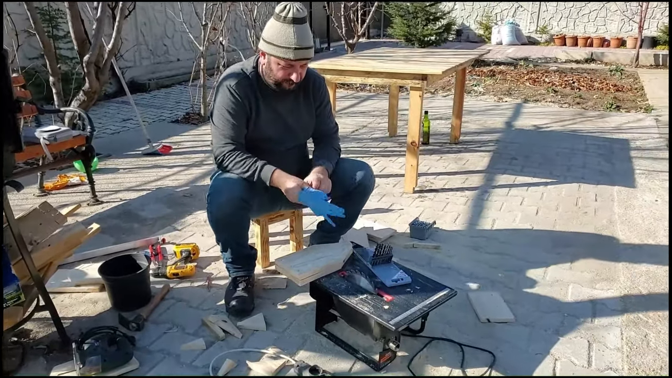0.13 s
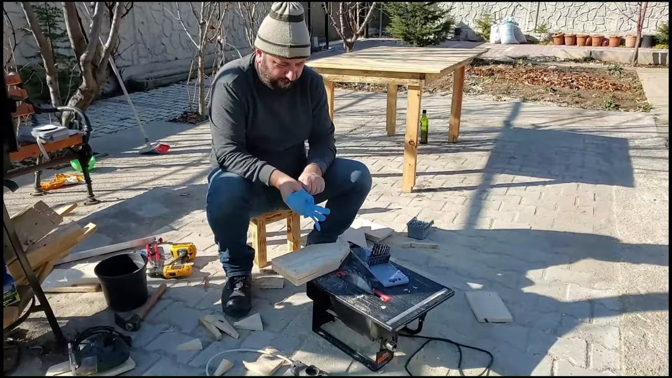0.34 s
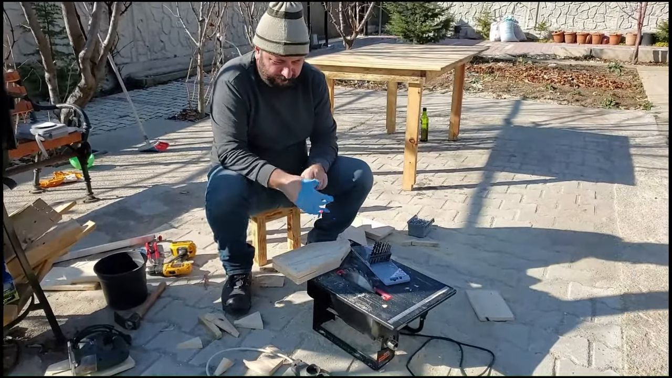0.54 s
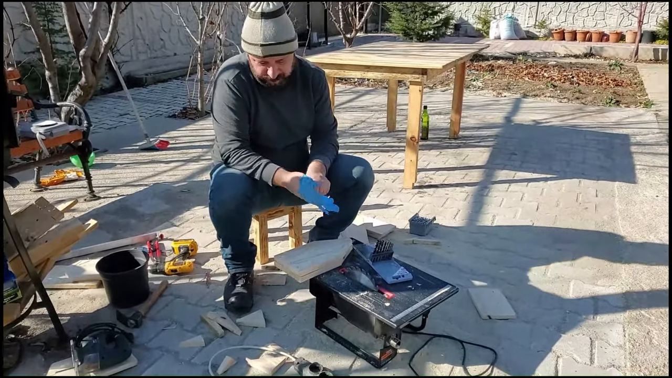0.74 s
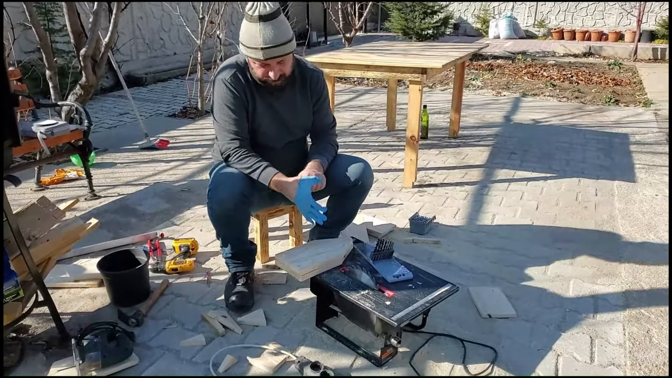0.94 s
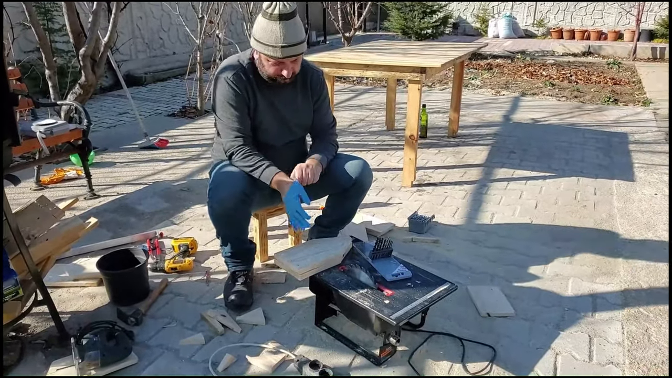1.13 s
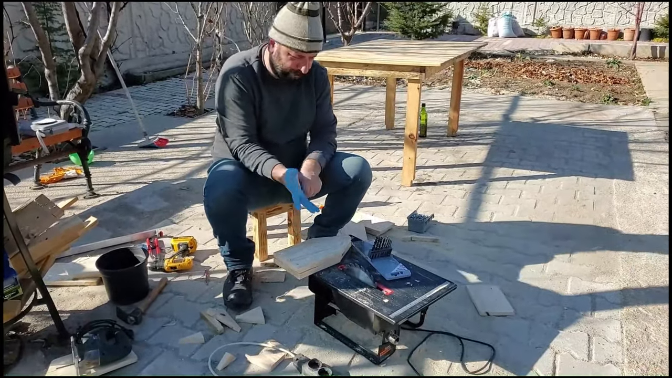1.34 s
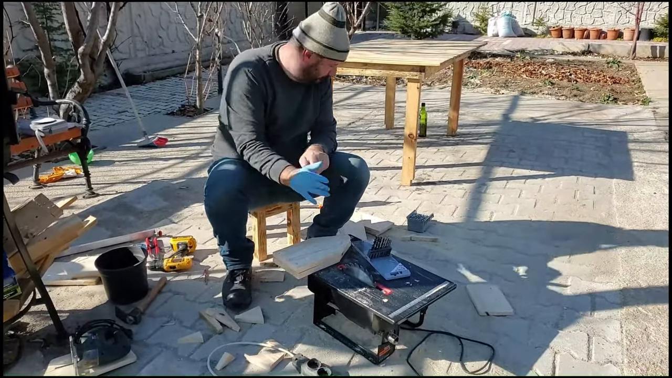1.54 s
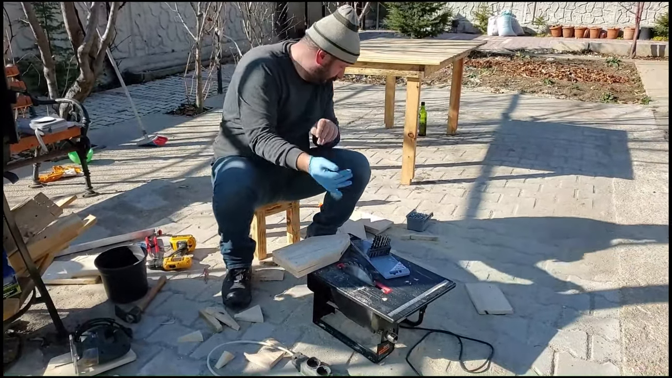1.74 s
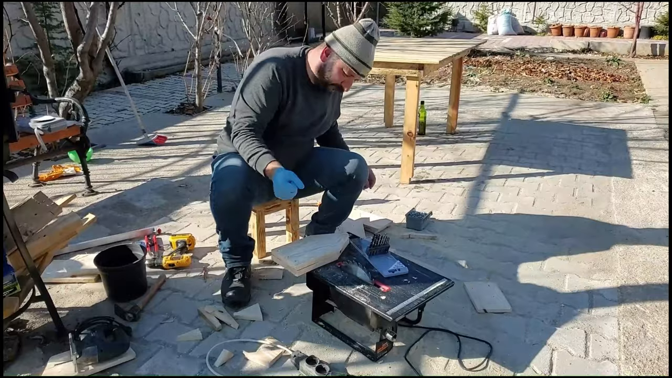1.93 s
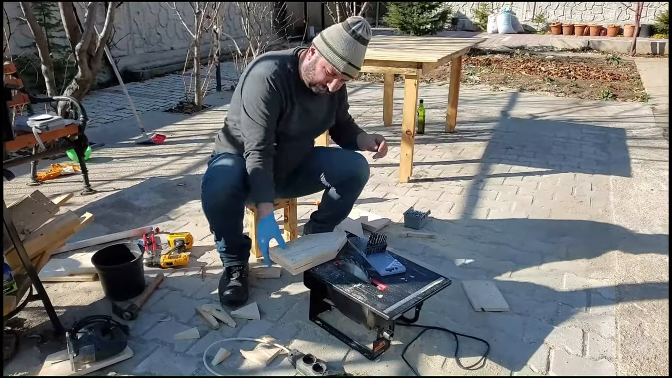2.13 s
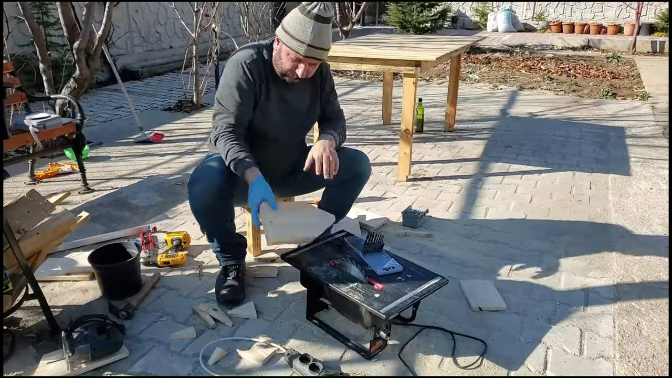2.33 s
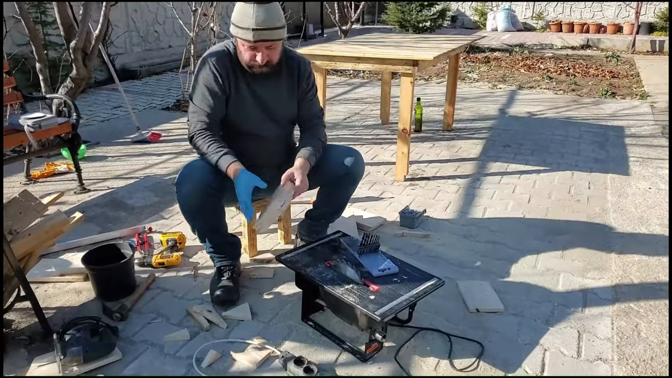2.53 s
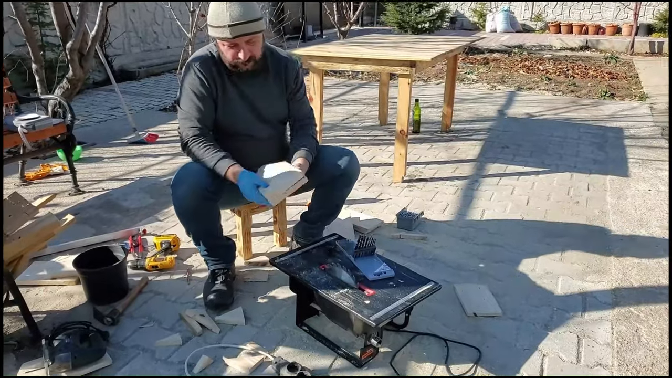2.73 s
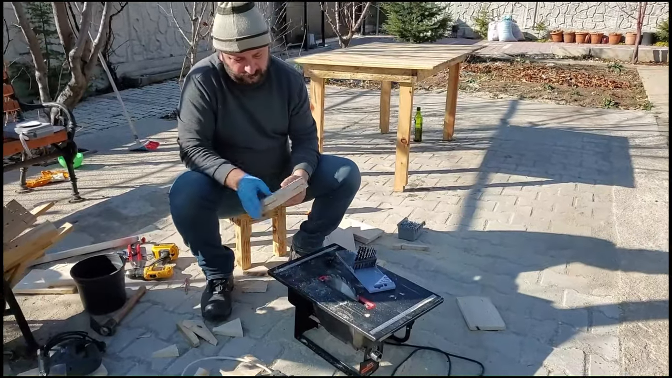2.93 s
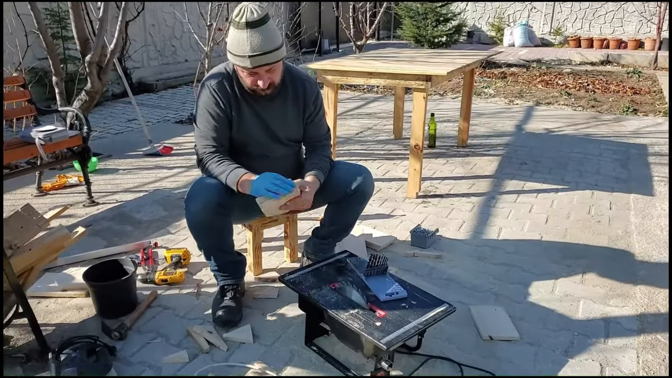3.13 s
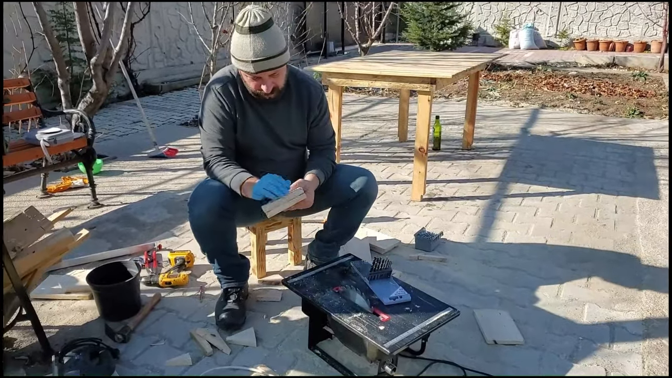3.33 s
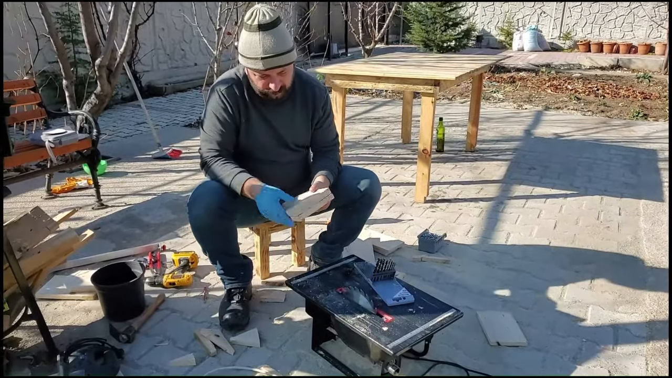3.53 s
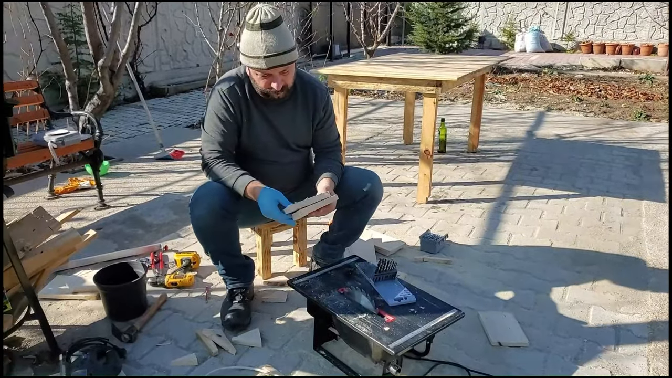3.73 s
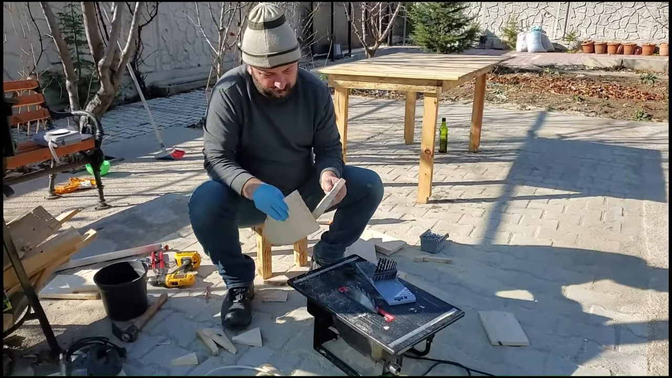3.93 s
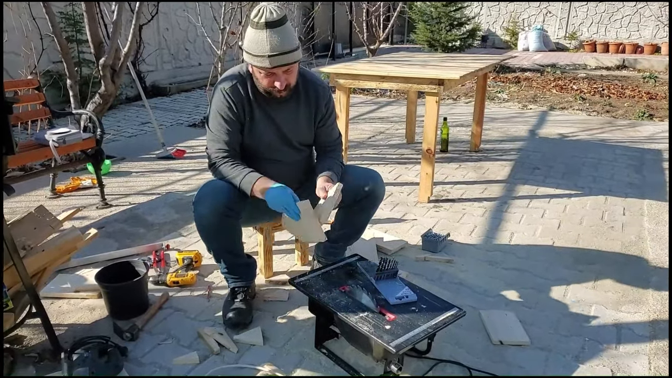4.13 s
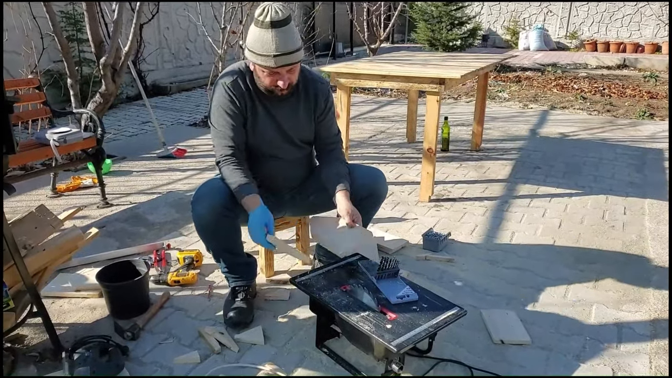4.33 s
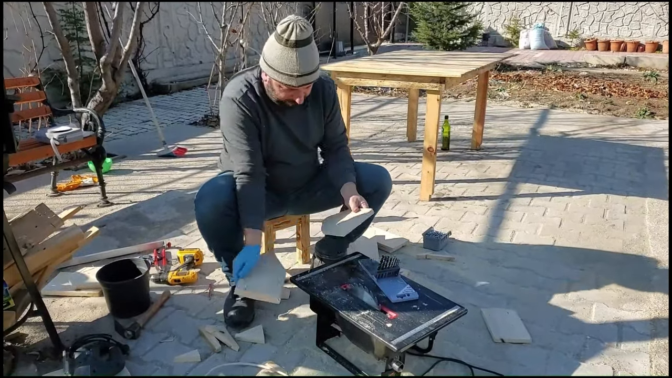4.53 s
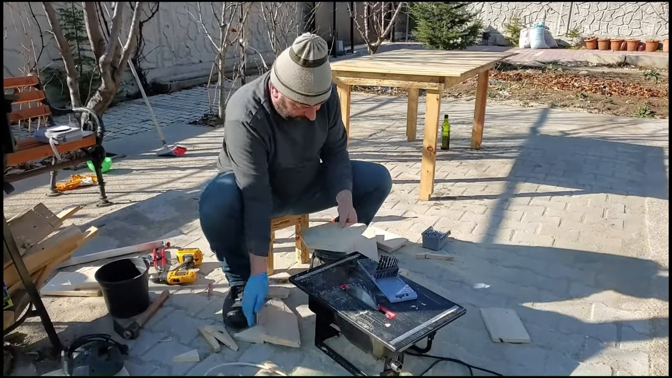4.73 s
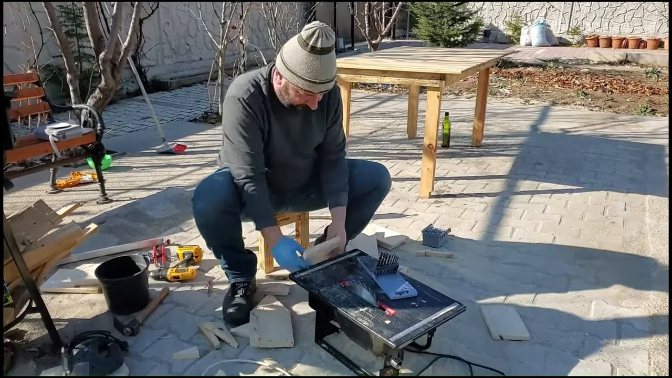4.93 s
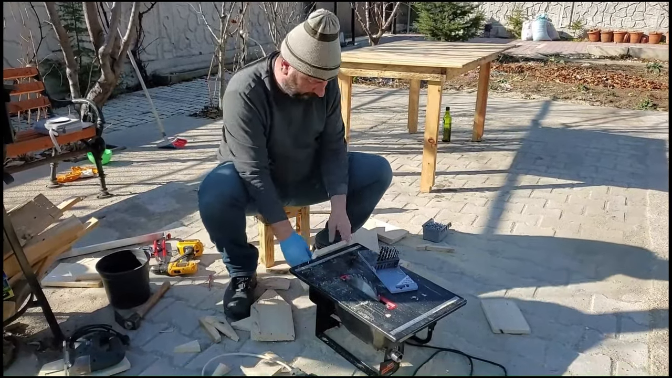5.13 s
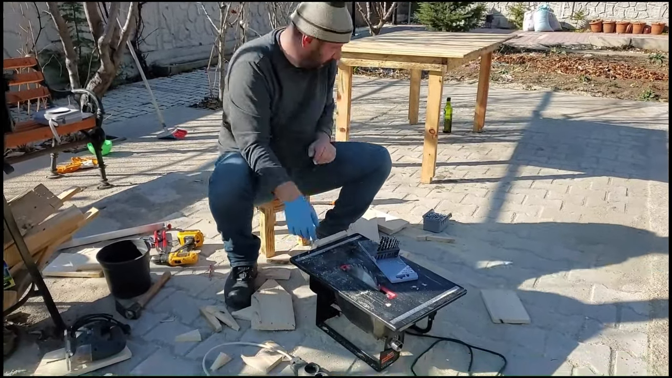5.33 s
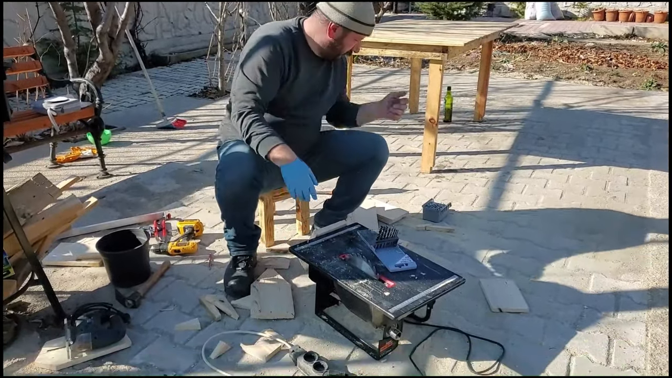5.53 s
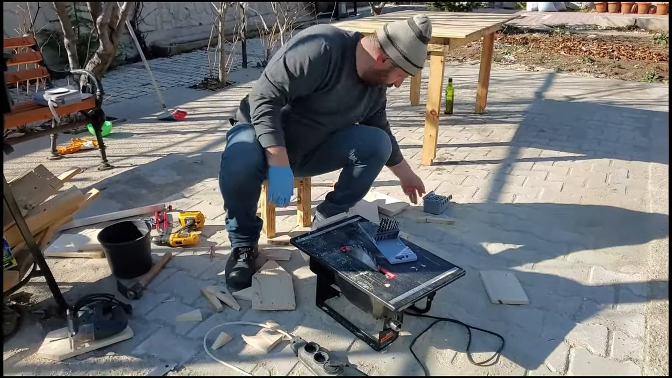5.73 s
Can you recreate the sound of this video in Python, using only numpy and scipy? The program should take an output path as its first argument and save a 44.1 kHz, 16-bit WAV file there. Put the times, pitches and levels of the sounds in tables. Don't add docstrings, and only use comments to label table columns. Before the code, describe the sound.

Soft finger rubbing starts quietly, followed by rubber squeaking and snapping, then cloth rustle and light wood scrapes. Two short, dry wooden claps with small rattles come next, then a bright clatter of a board on paving, a flat slap and a ringing corner touch. Small faint touches end it. Outdoor stereo pickup at moderate distance, with short wall reflections, low engine hum, distant road and light hiss.

```python
import sys
import numpy as np
from scipy import signal
from scipy.fft import rfft, irfft, next_fast_len
from scipy.io import wavfile
from scipy.ndimage import uniform_filter1d, map_coordinates

SR = 44100
rng = np.random.default_rng(int(sys.argv[2]) if len(sys.argv) > 2 else 0)


def log_audio(samples):
    frames = np.atleast_2d(samples).T
    limited = np.clip(frames, -1, 1)
    pcm = np.round(limited * 32767).astype(np.int16)
    wavfile.write(sys.argv[1], SR, pcm)


def gain_from_db(level_db):
    decades = np.asarray(level_db, float) / 20
    return 10 ** decades


N = 254942


def unit(x):
    return x / np.sqrt(np.mean(x ** 2) + 1e-20)


def along(points, hz):
    f, v = np.transpose(points)
    return np.interp(np.log(hz + 1), np.log(f + 1), v)


def curves(rows):
    s, *cols = np.transpose(rows)
    return [np.interp(np.arange(N) / SR, s, c) for c in cols]


def wobble(rate_hz):
    knots = rng.standard_normal(int(N * rate_hz / SR) + 4)
    return map_coordinates(knots, [np.arange(N) * rate_hz / SR])


def filtered(x, response):
    m = next_fast_len(N + SR // 2)
    return irfft(rfft(x, m) * response(np.fft.rfftfreq(m, 1 / SR)), m)[..., :N]


def coloured(x, gain):
    n = x.shape[-1]
    return unit(irfft(rfft(x) * gain(np.fft.rfftfreq(n, 1 / SR)), n))


def add(track, s, sound):
    part = track[..., round(s * SR):][..., :sound.shape[-1]]
    part += sound[..., :part.shape[-1]]


# frequency in Hz, left-right likeness.
LIKENESS = [(60, 1.0), (180, 0.9), (550, -0.07), (1650, -0.187), (4970, -0.12), (15000, 0.074)]


def rush(spectrum, patchy_db):
    z = signal.stft(rng.standard_normal((2, N)), nperseg=512)[2]
    field = uniform_filter1d(rng.standard_normal(z.shape[1:]), 6, 0)
    field = uniform_filter1d(field, 14, 1)
    pair = signal.istft(z * gain_from_db(patchy_db * unit(field)), nperseg=512)[1][:, :N]

    def mid_side(hz):
        turn = np.arccos(np.clip(along(LIKENESS, hz), -.93, .93)) / 2
        return gain_from_db(along(spectrum, hz)) * [np.cos(turn), np.sin(turn)]

    mid, side = filtered(pair, mid_side)
    return unit(np.array([mid + side, mid - side]))


# frequency in Hz, level in dB per Hz.
RUMBLE_SPECTRUM = [(12, -49), (24, -16.5), (48, -2), (66, -4), (82, -6), (92, -16.5), (300, -34.5),
                   (420, -86)]
TRAFFIC_SPECTRUM = [(150, -6.5), (204, -13.5), (274, -1.5), (1260, -3.5), (1850, -12), (2860, -26.5),
                    (6000, -44.5), (9000, -91.5)]
HISS_SPECTRUM = [(1470, -35), (2500, 0.5), (5710, -5), (7030, -6), (8520, -7), (14900, -4.5),
                 (15800, -10.5)]
# time in seconds, level in dB.
ROAD_LEVEL = [(0, -88.5), (.15, -84.5), (2.1, -82), (2.6, -78.5), (3.2, -74.5), (3.7, -77.5), (4.3, -72),
              (5.5, -73.5), (5.78, -70.5)]
RUMBLE_LEVEL = [(0, -62.5), (.7, -59), (.9, -56.5), (1.4, -60), (3.3, -60), (4.0, -61), (5.78, -55.5)]
# time in seconds, pitch in Hz, level in dB.
ENGINE_NOTES = [
    [(-.1, 57.8, -77), (0.278, 54.82, -60), (0.454, 53.76, -57.5), (0.8, 55.8, -62.5)],
    [(2.2, 62.74, -73.5), (2.6, 63.32, -59.5), (3.0, 62.35, -56.5), (3.3, 64.84, -56), (3.55, 62.23, -60),
     (3.75, 64.3, -59.5)],
    [(.75, 64, -63), (.9, 64.9, -54.5), (1.1, 67.3, -63), (1.35, 66.5, -67)],
    [(3.9, 66.7, -53.5), (4.1, 65.05, -60), (4.6, 62.45, -64.5), (5.1, 63.3, -64), (5.45, 63.3, -64.5),
     (5.9, 60.34, -62)],
    [(4.1, 292.4, -81.5), (4.3, 298, -81), (4.55, 300, -85)],
]


def yard():
    (road_db,), (rumble_db,) = curves(ROAD_LEVEL), curves(RUMBLE_LEVEL)
    road_lean_db, hiss_lean_db = [[.8], [-.8]], [[1.5], [-1.5]]
    sound = gain_from_db(rumble_db) * rush(RUMBLE_SPECTRUM, patchy_db=0.73)
    sound += gain_from_db(road_db + .4 * wobble(3)) * rush(TRAFFIC_SPECTRUM, patchy_db=1.1) * gain_from_db(road_lean_db)
    sound += gain_from_db(-89.5 + .7 * wobble(5.0)) * rush(HISS_SPECTRUM, patchy_db=2.5) * gain_from_db(hiss_lean_db)
    t = np.arange(N) / SR
    for rows in ENGINE_NOTES:
        hz, db = curves(rows)
        fade = np.clip(np.minimum(t - rows[0][0], rows[-1][0] - t) / 0.099, 0, 1)
        tone = np.sin(2 * np.pi * np.cumsum(hz) / SR)
        sound += np.sqrt(2) * gain_from_db(db + 0.64 * wobble(1.6)) * fade * tone
    return sound


# frequency in Hz, left minus right in dB.
SHADE = [(60, -4), (700, 3.5), (2070, 3), (3450, 0.5), (4800, 7.5), (8800, 9), (11500, 11), (15000, 7)]
# frequency in Hz, phase in radians by which left leads.
PHASE_LEAD = [(0, -0.5), (700, 0.06), (2070, 0.89), (3450, 0.97), (4800, 3), (8350, 12), (12000, 18),
              (15500, 21)]
# frequency in Hz, share.
STRAY_SHARE = [(150, .03), (750, .2), (1100, .45), (1700, .42), (2500, .35), (4000, 0.69), (8000, 0.64)]


def ports(x, lean):
    half = np.array([[.5], [-.5]])
    detours_s = rng.random((4, 1)) * .006
    ground_share, ground_s = 0.29, np.array([[0.0012], [0.001277]])

    def response(hz):
        bass_cut = hz ** 2 / (hz ** 2 + 75 ** 2)
        shade = gain_from_db(lean * half * along(SHADE, hz)) * np.exp(1j * half * along(PHASE_LEAD, hz))
        ground = 1 + ground_share * hz / (hz + 2500) * np.exp(-2j * np.pi * hz * ground_s)
        paths = np.exp(-2j * np.pi * hz * detours_s).sum(0) / np.sqrt(len(detours_s))
        stray = along(STRAY_SHARE, hz) * paths
        return bass_cut * shade * ground * (1 + 2 * half * stray)

    return filtered(x, response)


# frequency in Hz, t60 in seconds.
WALL_T60 = [(150, 0.22), (700, 0.081), (2500, 0.14), (6000, 0.087), (12000, 0.024)]


def walls(x):
    hz, t, z = signal.stft(rng.standard_normal((2, SR // 3)), SR, nperseg=128)
    early = gain_from_db(-60 * t / np.abs(along(WALL_T60, hz))[:, None])
    late = gain_from_db(-26 - 60 * t / 0.554) / (1 + (hz[:, None] / 1800) ** 2)
    tail = signal.istft(z * (early + late), SR, nperseg=128)[1]
    tail = tail + 0.18 * tail[::-1]
    delayed = np.pad(x, (round(0.0055 * SR), 0))
    return signal.fftconvolve(delayed[None], tail / np.linalg.norm(tail[0]), axes=1)


def slips(rough_db, rate_hz):
    return unit(rng.standard_normal(N) * gain_from_db(rough_db * wobble(rate_hz)))


def skin(pitch_hz, width_hz, skirt):
    def gain(hz):
        peak = 1 / np.hypot(1, (hz - pitch_hz ** 2 / (hz + 1)) / width_hz)
        return peak + skirt * hz / (1500 + hz) / (1 + (hz / 4800) ** 6)
    return gain


# start in seconds, peak in dB, fizz in dB, length in seconds.
SLEEVE_STROKES = [(.668, -78.5, 7, 0.03), (.704, -83, 9.5, 0.044), (1.774, -69, 4.5, 0.028),
                  (1.7915, -76, 0, 0.024), (1.8734, -71.5, 4, 0.02), (1.893, -71, -11, 0.027),
                  (2.143, -70.5, 3.5, 0.033), (2.172, -73.5, -1, 0.076), (2.2123, -60, 5, 0.014),
                  (2.31, -62.5, -21, 0.029), (2.335, -67.5, 3, 0.026), (2.3585, -72, -1, 0.021),
                  (2.394, -62, -2.5, 0.025), (2.66, -78, 13, 0.025), (2.69, -76, -4, 0.049),
                  (2.827, -73, -5, 0.043), (3.1744, -64, -30, 0.028), (3.226, -75.5, 8.5, 0.017),
                  (3.2654, -77, 12.5, 0.029), (3.64, -66, 1, 0.039), (3.762, -60, -12, 0.016),
                  (3.785, -66.5, -8, 0.016), (4.32, -66.5, -22, 0.028), (4.4692, -65, -25, 0.0077)]
GRIT_STROKES = [(3.862, -72, -22, 0.028), (4.029, -56, -18.5, 0.027), (4.6, -76.5, 1.5, .03),
                (4.6365, -66, -5.5, 0.0059), (4.654, -44, -18.5, 0.012), (4.6632, -36, -14.5, 0.0043),
                (4.669, -38.5, -14, 0.0093), (4.679, -47, -10, 0.0079), (4.693, -40.5, -2.5, 0.0059),
                (4.7035, -34.5, -4, 0.0039), (4.71, -55.5, -3, 0.0041), (4.724, -69.5, 4, 0.019),
                (4.7455, -50.5, -2, 0.004), (4.756, -70, -3, 0.03), (4.7955, -55, -2.5, 0.0035),
                (4.8, -72, -4.5, 0.064), (4.8205, -72, 4.5, 0.0029), (4.832, -75.5, -1.5, 0.031),
                (4.8495, -78, 2, 0.0056), (4.9, -56.5, -5.5, 0.014)]
BOARD_RUBS = [
    (2.362, -53.5, -6, 0.022),
    (3.566, -63, -8, 0.036),
    (3.622, -60.5, -4.5, 0.022),
    (3.643, -56.5, -12.5, 0.024),
    (3.668, -59, -9.5, 0.052),
    (3.695, -61.5, 5, 0.01),
    (3.745, -66, -13, 0.045),
    (5.752, -52.5, -32, 0.029),
]
FINGER_STROKES = [(.1986, -65.5, -6, 0.035), (.297, -70, -11, 0.03), (.37, -72, -7, 0.022),
                  (.401, -76, 2, 0.025), (.5344, -66, -33, 0.026), (.554, -80.5, -29, 0.069),
                  (.813, -78.5, 1, 0.034), (.8705, -64.5, -29, 0.017), (.989, -70.5, 3.5, 0.026),
                  (1.0214, -70, -4, 0.033), (1.047, -68, -0.5, 0.037), (1.074, -80.5, 0, 0.054),
                  (3.0256, -68, -28, 0.014), (3.4404, -67, -9, 0.0056), (.586, -83, -15, 0.011),
                  (5.29, -71.5, -17.5, 0.087), (5.6894, -74, -23, 0.029), (5.725, -78, -29, 0.035)]
STRETCH_STROKES = [(1.144, -69, -10, 0.035), (1.181, -54.5, -30, 0.027), (1.2044, -49.5, -14, 0.032),
                   (1.238, -52, -3.5, 0.017), (1.2546, -51, -7, 0.016), (1.292, -56, -15, 0.035),
                   (1.323, -62.5, -9, 0.049), (1.3894, -56.5, -32, 0.033), (1.4156, -38.5, -34, 0.034),
                   (1.468, -57, -25, 0.025), (1.488, -58.5, -31, 0.018), (1.5402, -46, -20, 0.0065),
                   (1.555, -52.5, -34, 0.017), (1.5775, -47.5, -4.5, 0.012)]
# frequency in Hz, level in dB per Hz.
FIZZ_SPECTRUM = [(3000, -12.5), (5500, -4.5), (7000, -7), (8500, -6.5), (12000, -8), (15500, -8.5)]
DUST_SPECTRUM = [(3000, -15), (5500, -10.5), (7000, -6.5), (8200, 0.5), (9800, -10), (11500, -8.5),
                 (13800, -4.5), (15500, -11.5)]
PUFF_SPECTRUM = [(120, -27), (250, -4), (500, 5), (750, 4.5), (1100, -4), (2000, -37)]
# frequency in Hz, width in Hz, level in dB over the broad one.
FOLD_LINES = [(1350, 190, -4.5), (1800, 46, 8), (2100, 120, -14), (2590, 110, 6), (3250, 200, -6),
              (4750, 150, -24)]
PLANK_LINES = [(745, 110, -5), (1170, 230, 16), (2200, 430, 8.5), (3380, 390, -6.5), (4840, 280, -9)]


def rubbing():
    near, t = np.zeros(N), np.arange(SR // 5) / SR
    jerks = slips(rough_db=2.5, rate_hz=500)
    creases = slips(rough_db=3.0, rate_hz=310)
    air = slips(rough_db=6.5, rate_hz=79)
    # strokes, resonance Hz, width share, puff dB, fizz spectrum, narrow resonances
    kinds = [(STRETCH_STROKES, 2220, 0.44, -4.5, FIZZ_SPECTRUM, FOLD_LINES),
             (FINGER_STROKES, 1480, 0.43, 5.5, FIZZ_SPECTRUM, []),
             (SLEEVE_STROKES, 2820, 0.75, -11.5, FIZZ_SPECTRUM, []),
             (GRIT_STROKES, 2100, 0.63, -1, DUST_SPECTRUM, []),
             (BOARD_RUBS, 2100, 0.32, -6, FIZZ_SPECTRUM, PLANK_LINES)]
    strokes = [(*row, *kind) for rows, *kind in kinds for row in rows]
    for s, db, fizz_db, length_s, pitch_hz, share, puff_db, fizz_spectrum, lines in strokes:
        shape = (1 - np.exp(-t / (.5 * length_s))) * np.exp(-(t / length_s) ** 2)
        when = round(s * SR) + np.arange(len(t))
        shifts = rng.standard_normal(len(lines))
        rung = [(hz * (1 + .02 * z), width_hz, gain_from_db(line_db + 3 * z))
                for (hz, width_hz, line_db), z in zip(lines, shifts)]
        broad = skin(pitch_hz, share * pitch_hz, skirt=0.7)

        def body(hz):
            return broad(hz) + sum(g / (1 + (2 * (hz - c) / w) ** 2) for c, w, g in rung)

        rub = coloured(jerks.take(when, mode="wrap"), body)
        fizz = coloured(creases.take(when, mode="wrap"), lambda hz: gain_from_db(along(fizz_spectrum, hz)))
        puff = coloured(air.take(when, mode="wrap"), lambda hz: gain_from_db(along(PUFF_SPECTRUM, hz)))
        mix = rub + gain_from_db(fizz_db) * fizz + gain_from_db(puff_db) * puff
        add(near, s, gain_from_db(db - 12.5) * shape / shape.max() * mix)
    return near


# start in seconds, level in dB, first pitch in Hz, last pitch in Hz, length in seconds.
SQUEAK_EVENTS = [(1.18, -68, 560, 570, .03), (1.185, -61, 2560, 2600, .06), (1.194, -58, 1790, 1830, .052),
                 (1.2, -60.5, 2270, 2200, .045), (1.255, -56, 2560, 2540, .025),
                 (1.285, -65, 760, 760, .016), (1.303, -65, 640, 740, .037), (1.316, -65, 900, 1280, .036),
                 (2.685, -85, 2640, 2530, .065), (1.336, -55.5, 560, 690, .036),
                 (1.3, -68, 1250, 1480, .045), (.556, -73, 730, 700, .024), (.558, -76, 1440, 1410, .022),
                 (2.135, -79, 1330, 1520, .04), (5.36, -76, 1260, 1270, .08)]


def squeaks():
    near = np.zeros(N)
    unsteady, grip_db = 1 + .025 * wobble(200), 3.5 * wobble(300)
    for s, db, first_hz, last_hz, length_s in SQUEAK_EVENTS:
        over_db = -18 - 6 * np.log2(first_hz / 600)
        u = np.arange(round(length_s * SR)) / (length_s * SR)
        part = slice(round(s * SR), round(s * SR) + len(u))
        hz = (first_hz + (last_hz - first_hz) * u) * unsteady[part]
        turn = 2 * np.pi * np.cumsum(hz) / SR
        tone = np.sin(turn) + gain_from_db(over_db) * np.sin(2 * turn)
        add(near, s, gain_from_db(db + grip_db[part]) * np.sin(np.pi * u) * tone)
    return near


# start in seconds, peak in dB,
# pitch in Hz, width in Hz, t60 in seconds.
SNAP_EVENTS = [(.987, -52, 8100, 8200, .02), (1.256, -39, 4750, 400, 0.057), (1.262, -36, 3760, 600, 0.059),
               (1.262, -38.5, 1350, 500, 0.13), (1.4172, -46, 2670, 500, 0.049),
               (1.419, -44, 1350, 350, 0.048), (1.4385, -32, 1920, 2400, 0.013),
               (1.4402, -32, 3000, 2220, 0.0082), (1.497, -46.5, 2800, 1200, 0.013),
               (1.5408, -44.5, 3100, 1480, 0.0053), (1.553, -42.5, 2480, 3000, 0.01),
               (1.58, -58, 2700, 3000, 0.036), (1.5826, -35.5, 2350, 4000, 0.034),
               (1.59, -52, 3950, 700, 0.024), (2.131, -62.5, 1340, 295, 0.32),
               (2.151, -65, 8340, 1200, .015), (2.168, -55, 1540, 300, 0.039),
               (2.213, -50.5, 3270, 398, 0.067), (2.217, -48, 8200, 6000, 0.047),
               (3.8015, -52.5, 9350, 3000, 0.015), (4.671, -16, 2557, 1800, 0.0033),
               (1.211, -46, 2000, 1200, 0.018), (1.2202, -42, 1910, 1200, 0.013),
               (1.2281, -50, 2100, 1200, .012), (1.235, -50, 1800, 1000, .012),
               (1.482, -46, 2820, 604, .02), (4.92, -53, 670, 40, 0.28), (5.0, -55.5, 705, 30, 0.24),
               (5.611, -58.5, 1400, 300, 0.037), (5.625, -60.5, 936, 301, 0.03),
               (5.688, -60, 980, 350, .03), (5.722, -53, 1500, 350, 0.036)]


def snaps():
    near, t = np.zeros(N), np.arange(SR // 5) / SR
    for s, db, pitch_hz, width_hz, t60 in SNAP_EVENTS:
        soft = 1 - np.exp(-2 * t * width_hz)
        snap = coloured(rng.standard_normal(len(t)), skin(pitch_hz, width_hz, skirt=0.1))
        add(near, s, gain_from_db(db - 16.5 - 60 * t / t60) * soft * snap)
        break_db = db + 12 - 300 * t60
        ring = np.exp(-.5 * np.pi * width_hz * t) * np.sin(2 * np.pi * pitch_hz * t)
        add(near, s + .0005, -gain_from_db(break_db) * soft * ring)
    return near


# start in seconds, level in
# dB, pitch in Hz, rise in seconds, t60 in seconds.
PLUCK_EVENTS = [(.3021, -57, 493, 0.0032, .045), (0.3941, -50.5, 170.5, 0.0015, .071),
                (.5941, -66, 646, .0031, .041), (.885, -51, 477, .0014, .031),
                (1.057, -58, 618, 0.0037, .08), (1.5807, -46.5, 181, .0006, .042),
                (1.583, -44, 493, .0002, .025), (3.8607, -45, 110, .0025, .088),
                (4.0311, -39, 109, 0.0034, .061), (4.6562, -38, 105, .001, .07),
                (4.738, -51.5, 1653, .0031, .031), (4.7454, -41, 159, 0.0011, .054),
                (4.8984, -44.5, 266.4, 0.001, .037), (5.6189, -46.5, 268.7, 0.00083, .061),
                (4.782, -51, 960, .002, .05), (4.822, -60, 917, .006, .1), (4.85, -61, 896, .004, .06),
                (4.872, -59, 950, .004, 0.053), (5.0, -65, 678, .012, 0.54), (5.001, -71, 700, .012, .35)]


def plucks():
    near, t = np.zeros(N), np.arange(SR // 5) / SR
    for s, db, hz, rise_s, t60 in PLUCK_EVENTS:
        add(near, s, gain_from_db(db - 60 * t / t60) * (1 - np.exp(-t / rise_s)) * np.sin(2 * np.pi * hz * t))
    return near


def glove():
    near = rubbing() + squeaks() + snaps() + plucks()
    return ports(near, lean=0.99) + gain_from_db(-17.0) * walls(near)[:, :N]


# frequency in Hz, level in dB per Hz.
GRAIN_SPECTRUM = [(100, -5.5), (300, -5), (800, -1.5), (2500, -8), (3500, -19.5), (6000, -34),
                  (9000, -42.5), (15000, -43)]


def knocks(contacts, modes, fall, clatter_t60, clatter_db, yard_db, lean, still_s=9):
    near, far, t = np.zeros(N), np.zeros((2, N)), np.arange(SR // 5) / SR
    for s, db, tilt_db, rise_s, spot_hz in contacts:
        def tilt(hz):
            octaves = np.log2(np.minimum(hz, 4000) / 1000 + 0.053)
            spot = np.exp(-(np.log2((hz + 1) / spot_hz) / .25) ** 2)
            return tilt_db * octaves + 5 * spot

        knots = rng.standard_normal((len(modes), len(t) // 100))
        places = np.meshgrid(np.arange(len(modes)), t * 130, indexing="ij")
        flutter_db = 2.5 * map_coordinates(knots, places, order=1)
        ring = np.zeros(len(t))
        for (hz, level_db, t60), sway_db in zip(modes, flutter_db):
            mode_db = level_db + tilt(hz) + sway_db - 60 * (t / t60) ** fall
            ring += gain_from_db(mode_db) * np.sin(2 * np.pi * hz * t)
        clatter = coloured(rng.standard_normal(len(t)), lambda hz: gain_from_db(along(GRAIN_SPECTRUM, hz) + tilt(hz)))
        sound = ring + gain_from_db(clatter_db - 60 * t / clatter_t60) * clatter
        sound *= 1 - np.exp(-t / rise_s)
        choke_db = -60 * np.maximum(s + t - still_s, 0) / 0.026
        sound = gain_from_db(db + choke_db) * sound / np.abs(sound).max()
        add(near, s, sound)
        add(far, s, gain_from_db(yard_db) * walls(sound))
    return ports(near, lean) + far


# start in seconds, peak in dB, tilt in dB per octave, rise in seconds, favoured Hz.
SHOVE_HITS = [
    (4.9055, -32, 0.41, 0.00064, 700),
    (4.93, -52, 2, 0.0014, 1000),
]
SLAP_HITS = [
    (4.8995, -24.5, 3, 0.00051, 574),
]
SETTLE_HITS = [
    (4.978, -31.5, -1.6, 0.0022, 624),
]
# frequency in Hz, level in dB, t60 in seconds.
STACK_MODES = [(493, -1.5, 0.015), (658, -0.5, 0.045), (1005, -4.5, 0.067), (1450, -19, 0.02),
               (1800, -13, .03), (2244, -8.5, 0.033), (2500, -28, 0.017), (4130, -23, 0.023),
               (5760, -25.5, 0.023)]
TRAPPED_MODES = [(350, 1.5, 0.005), (574, -0.5, 0.0061), (1400, -13.5, 0.0093), (2380, -16, 0.0058)]
CORNER_MODES = [(399, -13, 0.052), (591, -6, 0.067), (655.4, -10.5, 0.083), (1030, -15, 0.029),
                (1310, -14.5, 0.056), (1680, -15, .05), (2276, -17.5, 0.038)]


def stacking():
    wood = knocks(SHOVE_HITS, STACK_MODES, fall=1, clatter_t60=0.024, clatter_db=-8.0, yard_db=-13, lean=0.78)
    wood += knocks(SETTLE_HITS, CORNER_MODES, fall=1, clatter_t60=0.05, clatter_db=-12, yard_db=-13, lean=0.78)
    wood += knocks(SLAP_HITS, TRAPPED_MODES, fall=3, clatter_t60=0.01, clatter_db=-9.0,
                   yard_db=-14.5, lean=0.94)
    return wood


# start in seconds, peak in dB, tilt in dB per octave, rise in seconds, favoured Hz.
DROP_HITS = [
    (4.6372, -33, -8, 0.00043, 2750),
    (4.655, -34, -3.5, 0.00048, 505),
    (4.6645, -23.5, 0, 0.0012, 3030),
    (4.6712, -18.5, 1.5, 0.0011, 2400),
    (4.683, -42, 2, 0.00087, 2500),
    (4.694, -41, 0, .002, 2500),
    (4.7025, -34.5, -0.5, 0.00088, 1080),
    (4.7065, -35.5, -2, 0.00069, 1410),
]
FLOP_HITS = [
    (4.7475, -23, 0, 0.00082, 1200),
    (4.781, -49, -3.5, 0.0018, 960),
    (4.799, -44.5, -4, 0.0011, 1110),
    (4.82, -60.5, -2, .004, 920),
    (4.849, -62.5, 0, 0.0038, 909),
    (4.873, -61, -3, 0.0032, 950),
]
# frequency in Hz, level in dB, t60 in seconds.
BOARD_MODES = [(472, -13, .07), (630, -16, .06), (900, -10, .04), (1130, -2.5, .065), (1450, -10, .03),
               (1620, -13, .04), (1803, -6, .036), (2253, -5, .036), (2518, -3, .032), (2790, -9, .032),
               (3020, -7, .032), (3355, -14, .035), (3704, -22, .03), (4490, -13, .035)]
FLAT_MODES = [(480, -13, .065), (942, -8, .045), (1130, -5, .034), (1390, -2, .024), (1490, -6, .022),
              (1810, -7, .03), (2515, -7, .022), (2730, -13, .02)]


def dropped_board():
    wood = knocks(DROP_HITS, BOARD_MODES, fall=1, still_s=4.712, clatter_t60=0.04, clatter_db=-8,
                  yard_db=-19, lean=1.0)
    wood += knocks(FLOP_HITS, FLAT_MODES, fall=1, clatter_t60=0.037, clatter_db=-6.5, yard_db=-21.5, lean=2.5)
    return wood


# start in seconds, peak in dB, tilt in dB per octave, rise in seconds, favoured Hz.
FIRST_CLAP = [(3.7345, -49, 7.5, 0.001, 2450), (3.86, -17.5, -1.5, 0.0024, 1460),
              (3.8715, -24, 1, 0.0012, 1140), (3.875, -27, 6, 0.0014, 2240), (3.881, -30, 1.5, .0015, 1130),
              (3.889, -36.5, 1, 0.0018, 1150), (3.9, -41.5, -3.5, 0.0027, 402), (3.909, -44, 3, .002, 1140),
              (3.921, -47, 8.5, 0.0048, 2900), (3.932, -44, 1.5, 0.002, 400),
              (3.942, -47, 0.5, 0.0023, 450)]
SECOND_CLAP = [
    (4.0281, -17.5, -2, 0.0013, 1450),
    (4.043, -36, 6, 0.0042, 796),
    (4.056, -39, -4, 0.0036, 506),
    (4.0625, -29.5, 2.5, 0.0013, 887),
    (4.073, -47.5, 0, .003, 997),
    (4.084, -44, -18, 0.0029, 297),
]
# frequency in Hz, level in dB, t60 in seconds.
PAIR_MODES = [(248, -10.5, 0.017), (352, -16, 0.022), (482, -13, 0.018), (700, 3, 0.011),
              (1153, -10, 0.0232), (1449, -6.5, 0.014), (2133, -13.5, 0.02), (2500, -12.5, 0.014),
              (2900, -20.5, 0.012), (3560, -35, 0.01544)]
GRIPPED_MODES = [(270, -16.5, 0.013), (459.6, -15, 0.024), (634, -8.5, 0.014), (744.6, 2, 0.0098),
                 (985, -24, 0.028), (1450, -12.5, 0.021), (1980, -18, 0.018), (2578, -12.5, 0.0063),
                 (3310, -26.5, 0.0085)]


def claps():
    wood = knocks(FIRST_CLAP, PAIR_MODES, fall=3, clatter_t60=0.067, clatter_db=-6.0, yard_db=-12.0, lean=0.84)
    wood += knocks(SECOND_CLAP, GRIPPED_MODES, fall=3, clatter_t60=0.085, clatter_db=-12.5,
                   yard_db=-17.0, lean=1.0)
    return wood


def scene():
    return yard() + glove() + stacking() + dropped_board() + claps()


def roll_off(x):
    return signal.sosfilt(signal.butter(12, 15960, fs=SR, output="sos"), x)


def record(dry):
    def response(hz):
        dip = 1 - 0.38 * np.exp(-((hz - 6700) / 900) ** 2)
        return dip * (hz < 15750)

    return roll_off(filtered(dry, response))


dry = scene()
out = record(dry)
log_audio(out)
```